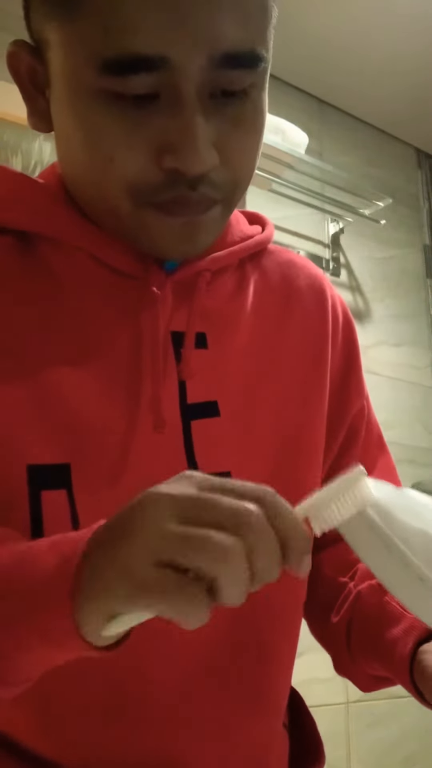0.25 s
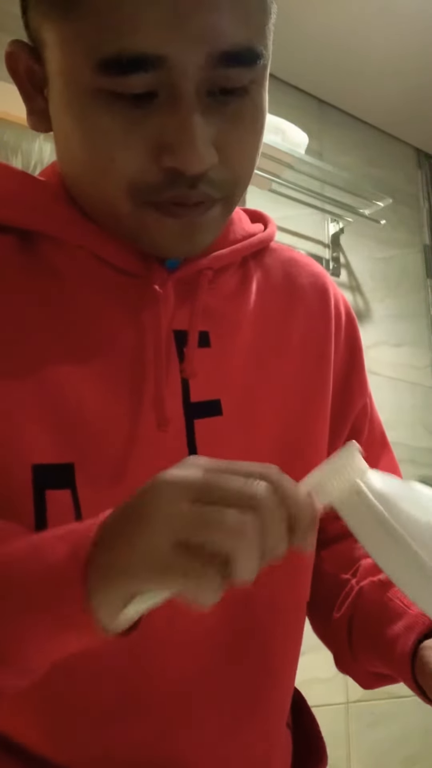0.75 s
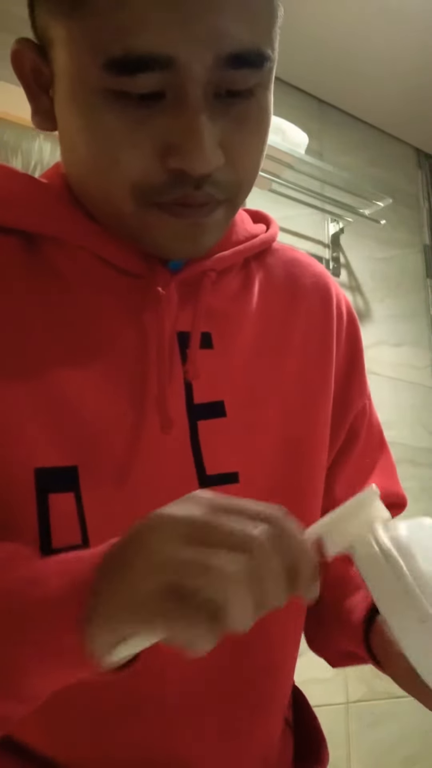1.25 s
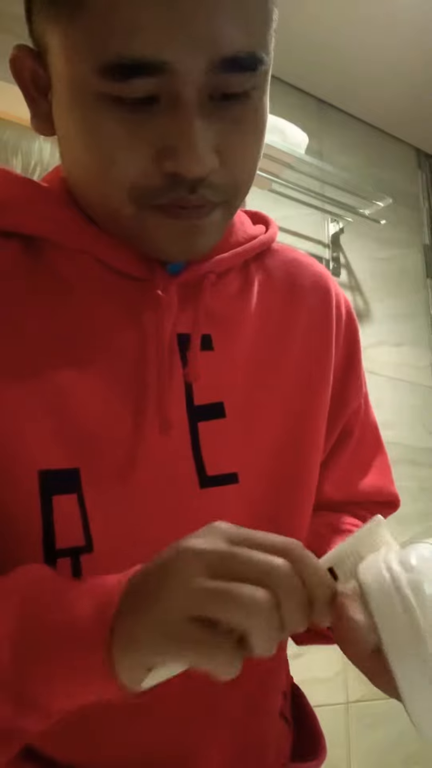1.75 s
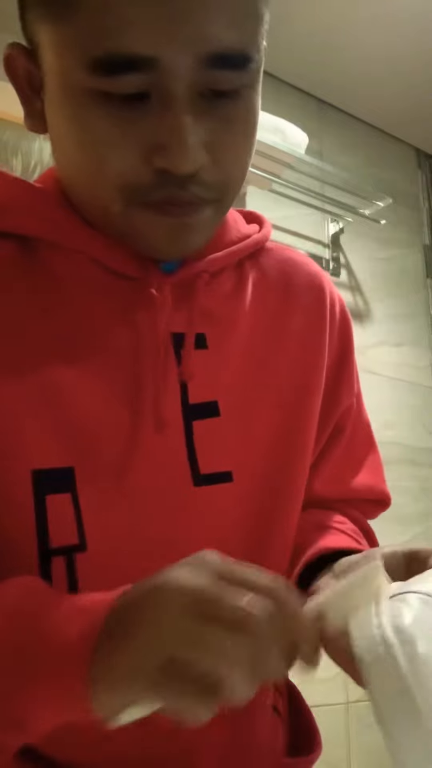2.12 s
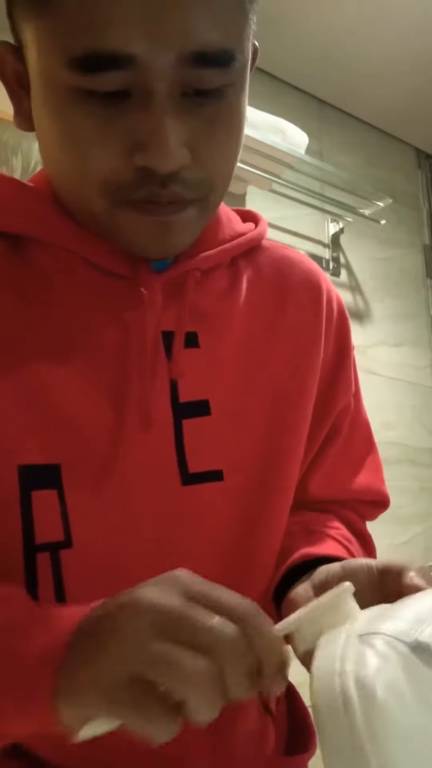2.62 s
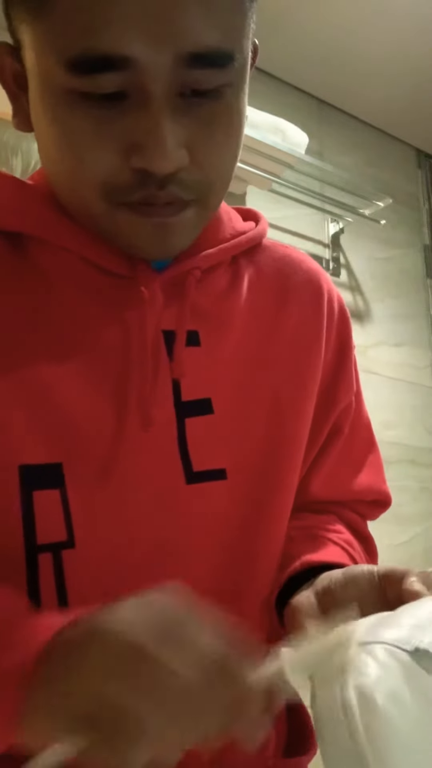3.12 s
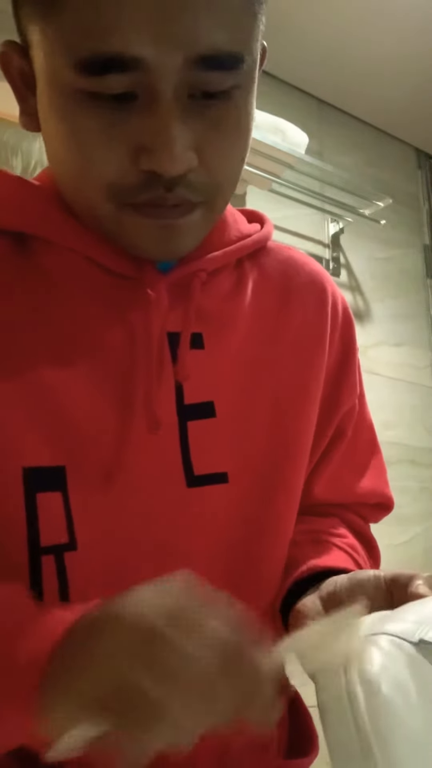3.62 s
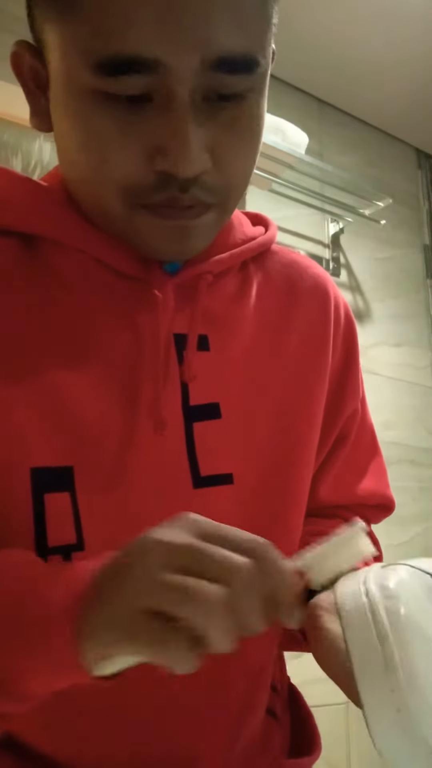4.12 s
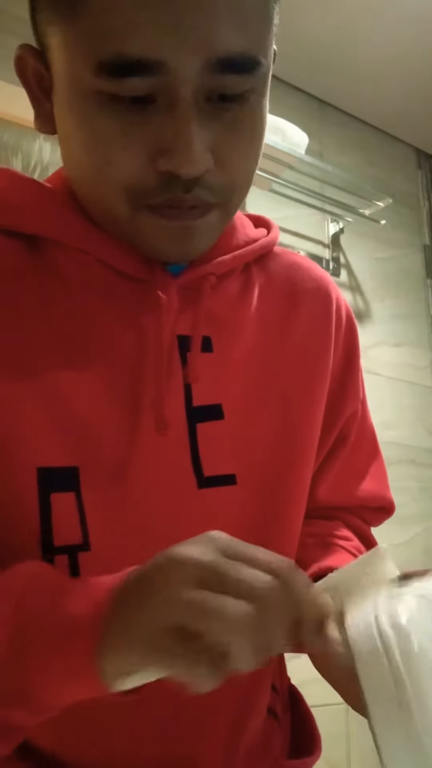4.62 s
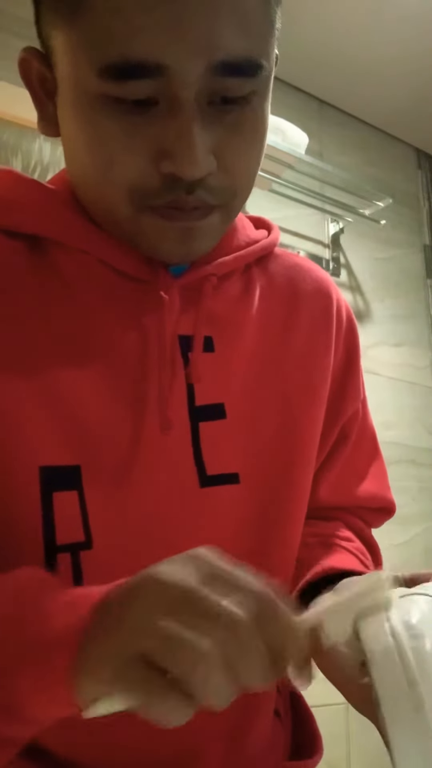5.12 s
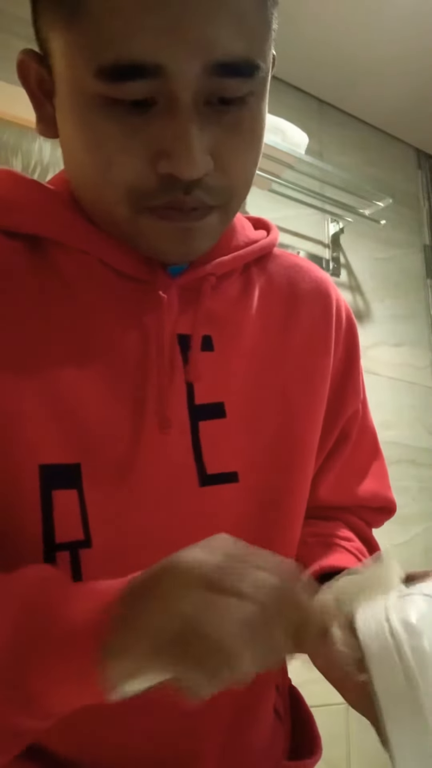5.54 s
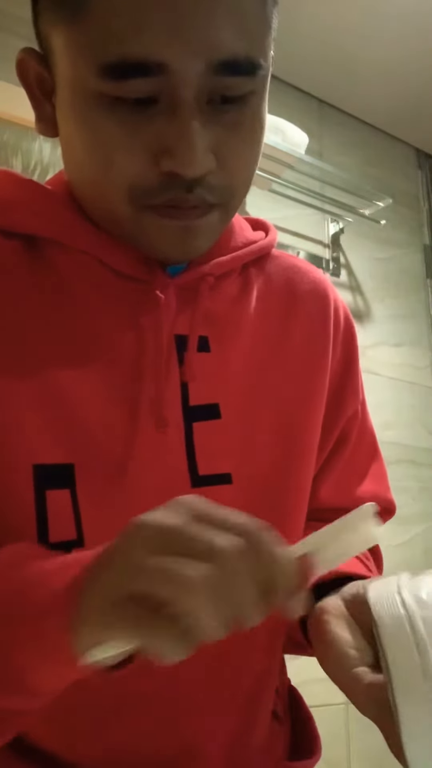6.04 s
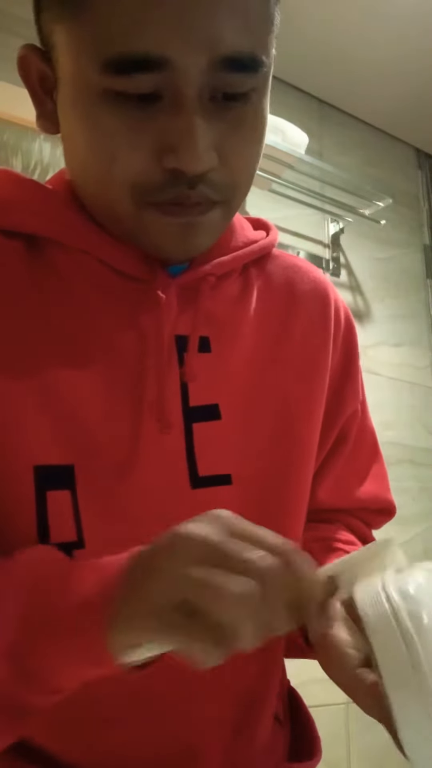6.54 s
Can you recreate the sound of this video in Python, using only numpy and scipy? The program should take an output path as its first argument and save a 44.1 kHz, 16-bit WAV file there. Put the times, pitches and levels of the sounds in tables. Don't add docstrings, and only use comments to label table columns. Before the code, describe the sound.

Stiff bristles scrub a rubber-soled shoe in quick to-and-fro strokes, with hollow knocks and faint squeaks, over a rumbling bathroom fan.

```python
import sys
import numpy as np
from scipy import signal
from scipy.fft import rfft, irfft, next_fast_len
from scipy.io import wavfile
from scipy.ndimage import uniform_filter1d

SR = 44100
rng = np.random.default_rng(int(sys.argv[2]) if len(sys.argv) > 2 else 0)


def nominal_scale(level):
    x = np.asarray(level, float) / 20
    return 10 ** x


def transcribe(signal):
    frames = np.atleast_2d(signal).T
    limited = np.clip(frames, -1, 1)
    pcm = np.round(limited * 32767).astype(np.int16)
    wavfile.write(sys.argv[1], SR, pcm)


N = 298557
SIZE = next_fast_len(N + SR)
FREQ = np.arange(SIZE // 2 + 1) * SR / SIZE
TIME = np.arange(N) / SR


def unit(x):
    return x / np.sqrt(np.mean(x ** 2))


def colour(x, table):
    hz, db = np.transpose(table)
    gain = nominal_scale(np.interp(np.log(FREQ + 1), np.log(hz), db, left=-90, right=-90))
    return unit(irfft(rfft(x, SIZE) * gain, SIZE)[:N])


def ring(x, hz, width):
    pole = np.exp(-np.pi * width / SR)
    return signal.lfilter([1, 0, -1], [1, -2 * pole * np.cos(2 * np.pi * hz / SR), pole ** 2], x)


def walk(rate):
    k = int(SR / rate)
    steps = np.repeat(rng.standard_normal(N // k + 1), k)
    return unit(uniform_filter1d(uniform_filter1d(steps, k), k)[:N])


def waver(hz, drift_hz, size):
    return np.sqrt(2) * size * np.sin(2 * np.pi * np.cumsum(hz + drift_hz * walk(6)) / SR)


# time of full speed in seconds, level in dB, length in ms.
PUSHES = [(0.004, -38.5, 23), (0.195, -38.5, 46), (0.375, -40, 45), (0.562, -35.5, 33), (0.762, -44.5, 34),
          (0.95, -37.5, 48), (1.161, -41.5, 37), (1.357, -43, 51), (1.577, -39, 43), (1.789, -43.5, 60),
          (2.013, -37, 57), (2.224, -35, 40), (2.44, -38, 72), (2.657, -36.5, 43), (2.874, -34.5, 50),
          (3.099, -34, 51), (3.322, -34, 46), (3.534, -33.5, 48), (3.753, -32, 56), (4.207, -39.5, 52),
          (4.405, -40.5, 71), (4.641, -37, 52), (4.862, -36.5, 71), (5.086, -36.5, 53), (5.315, -37.5, 62),
          (5.547, -36, 67), (5.78, -31.5, 55), (6.197, -36, 65), (6.414, -36.5, 64), (6.64, -33.5, 54)]
# time of full speed in seconds, level in dB, length in ms.
PULLS = [(0.093, -45, 40), (0.282, -38, 48), (0.466, -38, 41), (0.653, -45, 79), (0.846, -39.5, 49),
         (1.048, -37.5, 51), (1.241, -39.5, 55), (1.459, -44, 68), (1.67, -42.5, 49), (1.889, -38, 48),
         (2.108, -33, 42), (2.323, -32, 46), (2.548, -37, 46), (2.762, -36, 55), (2.981, -34.5, 54),
         (3.2, -33, 45), (3.421, -32.5, 40), (3.627, -34.5, 43), (4.306, -39, 46), (4.517, -39.5, 70),
         (4.738, -35, 50), (4.97, -37.5, 52), (5.189, -37.5, 52), (5.42, -36, 55), (5.652, -37.5, 65),
         (6.297, -35.5, 49), (6.52, -35.5, 47), (6.738, -35, 59)]
# tip brightness in dB, sole rub in dB, short-tuft share in dB.
TUFT_LIE = [(-3.5, 3, -0.3), (-3.5, 2.1, -0.5)]
# time in seconds, rub in dB.
LEANING = [(0, -14), (.6, -10.5), (1.0, -13), (1.8, -13), (2.1, -12), (2.6, -14), (3.1, -11.5), (3.7, -9.5),
           (4.3, -13), (5.3, -7), (6.77, -8)]
# time in seconds, short-tuft share in dB.
TILT = [(0, 0.5), (.7, -0.5), (1.0, 1.5), (1.4, 0.5), (2.2, 2), (3.0, 0.5), (3.7, -1), (4.4, 0.5), (5.0, 1),
        (5.8, 0), (6.77, 1)]
# spread in dB of the tips, the rub and the short tufts.
UNEVEN_DB = (0.5, -0.5, 0.15)
# level in dB, for long, short, tips, sole.
DRAG_DB = [
    [-16.5],
    [-11],
    [-11.5],
    [-8.5],
]


def stroke_power():
    stretch, unevenness, speed_power, early_s = 0.93, -0.13, 1.94, 0.0001
    usual_db, rub_lag = -41.5, 0.73
    tips_follow = 0.15
    drag = nominal_scale(2 * np.array(DRAG_DB))
    out = np.zeros((4, N))
    for strokes, lie in zip((PUSHES, PULLS), TUFT_LIE):
        chances = rng.standard_normal((len(strokes), 3))
        for (s, db, ms), chance in zip(strokes, chances):
            tip_db, sole_db, short_db = np.array(lie) + chance * UNEVEN_DB
            rub_db = np.interp(s, *np.transpose(LEANING))
            short_db = short_db + np.interp(s, *np.transpose(TILT))
            sole_db = sole_db + rub_db - rub_lag * (db - usual_db)
            tip_db = tip_db + tips_follow * (rub_db + 4.5)
            reach_s = 2 * ms / 1000
            near = slice(max(int((s - reach_s) * SR), 0), int((s + reach_s) * SR))
            place = (TIME[near] - s + early_s) / (stretch * ms / 1000)
            place = place * (1 - unevenness * np.sign(place))
            speed = np.cos(np.clip(place, -1, 1) * np.pi / 2) ** (2 * speed_power)
            down = (place > 0) | all(abs(s - touch[0] - .07) > .07 for touch in TOUCHES)
            speed = speed + down * drag * np.cos(np.clip(place / 1.51, -1, 1) * np.pi / 2) ** 2
            row_db = np.array([[-short_db / 2], [short_db / 2], [tip_db], [sole_db]])
            out[:, near] += speed * nominal_scale(2 * (db + row_db))
    return out


# start in seconds, level in dB, creep in ms, tick in dB, tip brightness in dB.
TOUCHES = [
    (4.108, -57.5, 51, -8, -4),
    (4.166, -55, 20, 0, 4),
    (6.083, -62, 39, 14, -1),
    (6.132, -55, 30, -10, 3),
]


def touch_power():
    out = np.zeros((4, N))
    for s, db, ms, tick_db, tip_db in TOUCHES:
        since_ms = np.maximum(TIME - s, 0) * 1000
        creep = np.exp(-(since_ms / ms) ** 4) + nominal_scale(2 * tick_db) * np.exp(-since_ms / 0.92)
        out += (TIME > s) * creep * nominal_scale(2 * (db + np.array([[-3.1], [0], [tip_db], [-6]])))
    return out


def bristle_levels():
    power = stroke_power() + touch_power()
    own_flutter = np.array([walk(40) for _ in range(4)])
    return np.sqrt(power) * nominal_scale(1.7 * walk(70) + 1.0 * own_flutter)


def flicks(share, scatter_db):
    happens, side, luck = rng.random((3, N))
    size_db = scatter_db * np.minimum(-np.log(1 - luck), 6)
    return (happens < share) * np.sign(side - .5) * nominal_scale(size_db)


# frequency in Hz, level in dB.
LONG_TUFTS = [(3000, -24), (4400, -14), (4900, -7), (5900, -4), (6300, -2), (6900, 0), (7500, -2),
              (8100, -2), (8700, -9), (10000, -30)]
# frequency in Hz, level in dB.
SHORT_TUFTS = [(7000, -30), (8000, -10), (8600, -3.5), (9150, 1), (9600, -2), (10000, -6.5), (11000, -7.5),
               (11500, -6), (12500, -14), (14000, -30)]
# frequency in Hz, level in dB.
TIPS = [(9500, -30), (11500, -12), (12100, -4), (12750, 0), (14100, -.5), (14800, -3), (15500, -6),
        (17000, -10)]
# frequency in Hz, level in dB.
SOLE = [(250, -38), (450, -11), (900, -5), (1600, -8), (2100, -14.5), (2800, -10), (3250, -9.5), (3500, -4),
        (3800, -7), (4250, -8), (4500, -11), (4750, -1.5), (5000, -3.5), (6000, -25), (8000, -47)]


def brush(levels):
    long_tufts = nominal_scale(-7.0) * levels[0] * colour(flicks(0.35, 2.3), LONG_TUFTS)
    short_tufts = nominal_scale(-8.5) * levels[1] * colour(flicks(0.4, 3.0), SHORT_TUFTS)
    tips = nominal_scale(-3.0) * levels[2] * colour(flicks(0.18, 0.87), TIPS)
    sole = nominal_scale(-2.0) * levels[3] * colour(flicks(0.2, 3.13), SOLE)
    return long_tufts + short_tufts + tips + sole


# start in seconds, peak in dB, pitch of the hollow in Hz, wait for the bounce in ms.
KNOCKS = [(0.272, -35.5, 343, 38), (0.316, -38, 369, 14.5), (0.547, -36.5, 382, 12.3),
          (1.375, -33, 360, 60), (1.547, -33, 374, 12), (1.582, -37, 420, 9.1), (2.849, -34, 417, 15),
          (3.013, -39, 450, 12), (3.08, -31.5, 404, 19), (3.178, -36.5, 404, 11), (3.295, -32, 357, 25),
          (3.306, -34.5, 377, 37), (3.318, -32, 360, 12), (3.413, -35, 360, 15), (3.5159, -24, 408, 17.8),
          (3.613, -33.5, 420, 24), (3.719, -35, 360, 4.7), (3.727, -28, 409, 33), (4.617, -36, 366, 13),
          (4.942, -35.5, 453, 23), (5.063, -30, 378, 16.4), (5.161, -36, 413, 15.5), (6.084, -42, 369, 12),
          (6.607, -31, 410, 30), (6.614, -30, 430, 19)]


def knocks():
    width, bounce_db = 78.0, -6.5
    tick_db, tick_hz = -14.5, 855.0
    lead, rise = int(4.0 * SR / 1000), int(1.73 * SR / 1000)
    out, span = np.zeros(N + 4096), np.zeros(4096)
    push = np.hanning(int(1.48 * SR / 1000))
    span[:len(push)] = push
    click = 1. * (np.arange(4096) == 0)
    tick = ring(click, tick_hz, 220.0)
    tick = nominal_scale(tick_db) * tick / np.abs(tick).max()
    for s, db, hz, bounce_ms in KNOCKS:
        both = span + nominal_scale(bounce_db) * np.roll(span, int(bounce_ms * SR / 1000))
        thud = ring(ring(both, hz, width), 1.05 * hz, 2.7 * width)
        thud = np.roll(thud, lead - rise)
        start = int(s * SR) - lead
        out[start:start + 4096] += nominal_scale(db + 0.5) * (thud / np.abs(thud).max() + tick)
    return out[:N]


# middle in seconds, level in dB, pitch in Hz, length in ms.
SQUEAKS = [
    (0.43, -59.5, 1577, 49),
    (2.135, -57, 1735, 45),
    (2.2, -64, 1780, 25),
    (2.76, -63, 1703, 30),
    (2.89, -59, 1754, 53),
]


def squeaks():
    out = np.zeros(N)
    for s, db, hz, ms in SQUEAKS:
        bell = np.exp(-((TIME - s) * 1000 / ms) ** 2)
        out += waver(hz, 30.0, nominal_scale(db + 1.0 + 2.1 * walk(60)) * bell)
    return out


# frequency in Hz, seconds to fall by 60 dB.
TILES = [(300, .36), (2000, .38), (6000, .27), (10000, .27), (15000, .18)]


def tiles(x):
    f, t, tail = signal.stft(rng.standard_normal((2, SR // 2)), SR, nperseg=256)
    hz, seconds = np.transpose(TILES)
    t60 = np.interp(np.log(f + 1), np.log(hz), seconds)[:, None]
    tail = signal.istft(tail * nominal_scale(-60 * t / t60) / np.sqrt(t60), SR, nperseg=256)[1]
    tail = tail * np.minimum(np.arange(tail.shape[1]) / (0.0025 * SR), 1)
    tail = tail / np.sqrt(np.sum(tail[0] ** 2))
    place = 2 * np.pi * walk(2)
    sent = x * np.array([np.cos(place), np.sin(place)])
    echoes = signal.fftconvolve(sent, tail, axes=1).sum(axis=0)[:N]
    return x + nominal_scale(-4) * echoes


def swell(gusts, calm_db):
    t = TIME[::64]
    power = nominal_scale(2 * calm_db)
    for s, db, ms in gusts:
        power = power + nominal_scale(2 * db) * np.exp(-2 * ((t - s) * 1000 / ms) ** 2)
    return np.interp(TIME, t, np.sqrt(power))


# frequency in Hz, level in dB.
FAN = [(28, -11), (45, -14), (60, -4), (120, -0.5), (250, -5), (420, -1), (650, -9), (800, -16.5),
       (1050, -16.5), (1400, -18), (1750, -22), (2050, -51), (2300, -68)]
# frequency in Hz, level in dB.
FAN_HISS = [(4000, -20), (4300, 0), (5500, -1), (6300, -7), (9000, -9), (11500, -12), (13000, -16),
            (15800, -19)]
# frequency in Hz, width in Hz, level in dB.
BOOMS = [(39.8, 2, -56.5), (190.4, 8.5, -56), (224.4, 11, -60), (285, 19, -65.5), (371, 15, -57.5),
         (457, 25, -60.5), (513.8, 3.7, -59.5), (619.5, 29, -61), (731.6, 47, -56), (1309, 3.3, -69),
         (1758, 7.2, -71)]
# middle in seconds, level in dB, length in ms.
DUCT_GUSTS = [(0.03, -40, 32), (0.3, -47.5, 200), (0.55, -47, 310), (0.92, -48, 180), (1.48, -49, 100),
              (1.86, -49.5, 150), (2.17, -47, 84), (2.47, -45, 40), (2.66, -50, 55), (3.03, -52, 150),
              (3.6, -42, 100), (3.92, -41.5, 44), (4.19, -45, 100), (4.6, -41.5, 93), (4.88, -44, 60),
              (5.2, -44, 83), (5.47, -47, 97), (5.68, -44, 42), (5.92, -44, 130), (6.31, -41.5, 160),
              (6.62, -43, 62), (6.77, -45, 26)]
# frequency in Hz, level in dB.
ROOM_BOOM_HZ = [(144, -4.5), (161, -3)]
# middle in seconds, level in dB, length in ms.
ROOM_GUSTS = [(0.04, -43.5, 33), (0.13, -42, 18), (0.36, -46.5, 140), (0.67, -46.5, 150),
              (0.92, -46.5, 210), (1.13, -43.5, 30), (1.28, -46, 41), (1.53, -43.5, 65), (1.72, -41.5, 83),
              (1.84, -44, 54), (1.98, -44, 19), (2.2, -51, 200), (2.58, -47, 64), (2.9, -47, 240),
              (3.05, -41, 36), (3.23, -41.5, 95), (3.47, -42.5, 105), (3.69, -52, 27), (3.98, -47, 85),
              (4.2, -46, 160), (4.35, -44, 50), (4.66, -41.5, 114), (5.0, -48, 170), (5.3, -45, 120),
              (5.6, -43.5, 250), (5.87, -41.5, 160), (6.15, -45, 88), (6.28, -42, 47), (6.45, -45.5, 48),
              (6.69, -48.5, 210)]
# frequency in Hz, level in dB.
HUM = [(100, -69), (300, -47.5)]


def fan():
    out = nominal_scale(-45.5 + 0.89 * walk(4.67)) * colour(rng.standard_normal(N), FAN)
    out += nominal_scale(-79.5) * colour(rng.standard_normal(N), FAN_HISS)
    booms = sum(nominal_scale(db) * unit(ring(rng.standard_normal(N), hz, width)) for hz, width, db in BOOMS)
    out += signal.sosfilt(signal.butter(4, 2300, fs=SR, output="sos"), booms)
    out += waver(75.94, 2.76, swell(DUCT_GUSTS, calm_db=-57.5))
    for hz, db in ROOM_BOOM_HZ:
        out += nominal_scale(db) * waver(hz, 3.974, swell(ROOM_GUSTS, calm_db=-53.5))
    for hz, db in HUM:
        level = np.sqrt(2) * nominal_scale(db + .8 * walk(5))
        out += level * np.sin(2 * np.pi * hz * TIME + .15 * walk(4))
    return out


# frequency in Hz, level in dB.
GRILLE = [(1800, -10), (2050, -6), (2400, -6), (2750, 0), (3800, -2), (4150, -5), (4350, -30)]


def grille():
    return nominal_scale(-73.5) * np.array([colour(rng.standard_normal(N), GRILLE) for _ in range(2)])


# frequency in Hz, lead of the left in radians beyond
# the plain lag, left minus right in dB, likeness from 0 to 1.
PORTS = [(0, 0, 0, .999), (80, 0, -.4, .999), (330, .3, -2.6, .993), (550, .5, 0, .92),
         (700, .55, 1.3, .85), (830, .64, 4.3, .88), (950, -.6, 2.5, .45), (1150, -1.6, -2, .85),
         (1500, .2, -1.5, .6),
         (1750, 0, 1, .82), (2080, -1.5, 0, .82), (2260, -1.6, 0, .66), (2800, -3.3, 0, .45),
                (3100, -2.2, 0, .55), (3400, -1.2, 0, .6), (3620, -.5, 0, .86), (3760, -.4, 0, .84),
                (3900, -.3, 0, .54), (4080, -.2, 0, .56),
         (4280, 0, 0, .95), (4500, .15, 0, .95), (4900, .2, 0, .84), (6000, 0, 0, .84),
                (7700, 0, 0, .97), (9000, .15, 0, .97), (10500, .1, 0, .74), (11900, -.15, 0, .96),
                (13500, .15, 0, .96), (15000, 0, 0, .74), (22000, 0, 0, .74)]


def ports(shared, apart):
    hz, turn, balance_db, alike = np.transpose(PORTS)
    lag_samples = 5.17
    turn = np.interp(FREQ, hz, turn) - 2 * np.pi * FREQ * lag_samples / SR
    alike = np.clip(np.interp(FREQ, hz, alike), 0, 1)
    same = np.sqrt((1 + alike) / 2) * rfft(shared, SIZE)
    other = np.sqrt((1 - alike) / 2) * rfft(apart, SIZE)
    half = nominal_scale(np.interp(FREQ, hz, balance_db) / 2) * np.exp(.5j * turn)
    delay = np.exp(-2j * np.pi * FREQ * 64 / SR)
    both = np.array([(same + other) * half, (same - other) / half])
    return irfft(delay * both, SIZE)[:, 64:N + 64]


def scene():
    levels = bristle_levels()
    thuds = knocks() + squeaks()
    wet = nominal_scale(-3.5)
    shared, apart = (tiles(brush(levels) + wet * thuds) + (1 - wet) * thuds + fan() for _ in range(2))
    return ports(shared, apart) + grille()


def low_pass(x):
    return signal.sosfilt(signal.butter(12, 17000, fs=SR, output="sos"), x)


def record(dry):
    mix = signal.sosfilt(signal.butter(4, 33, "high", fs=SR, output="sos"), dry)
    return low_pass(mix)


dry = scene()
out = record(dry)
transcribe(out)
```